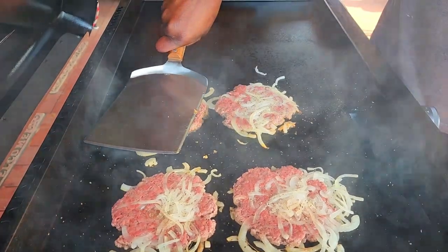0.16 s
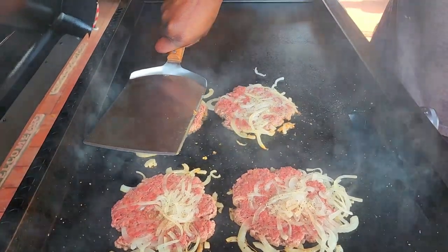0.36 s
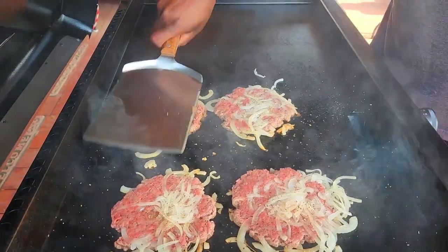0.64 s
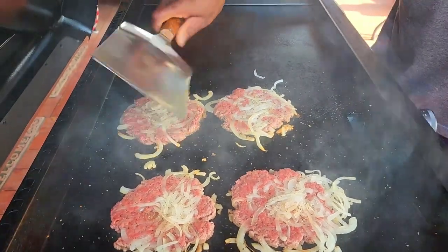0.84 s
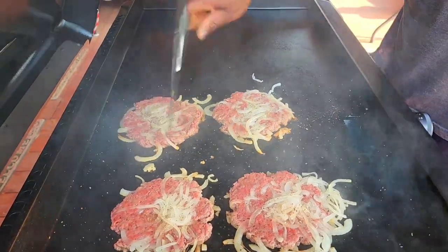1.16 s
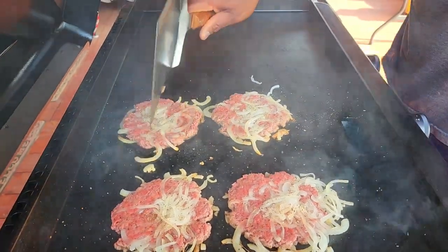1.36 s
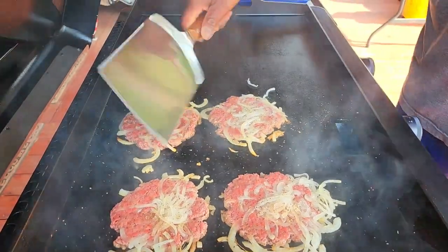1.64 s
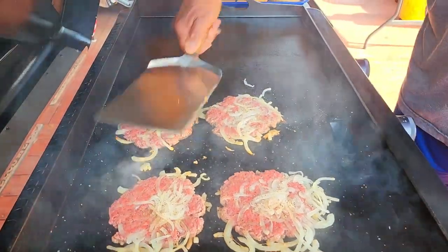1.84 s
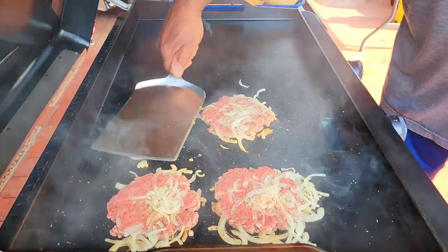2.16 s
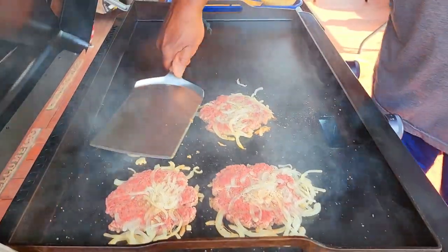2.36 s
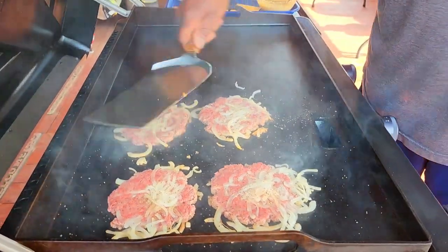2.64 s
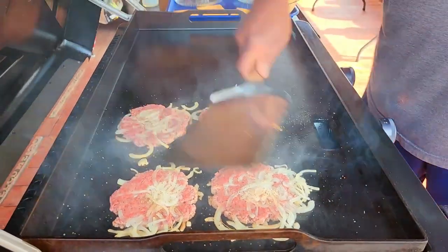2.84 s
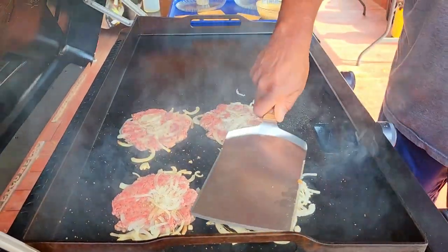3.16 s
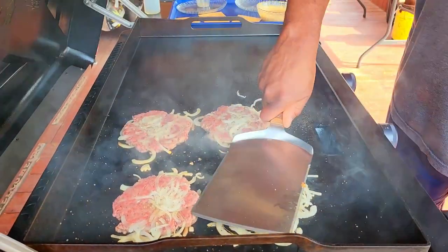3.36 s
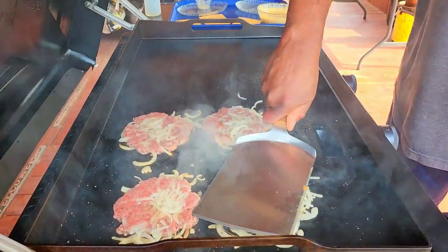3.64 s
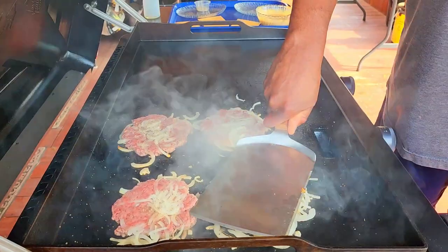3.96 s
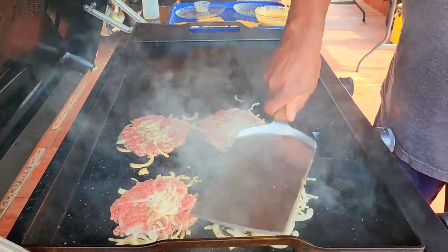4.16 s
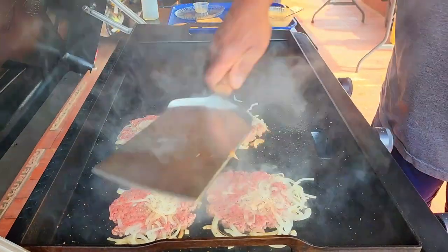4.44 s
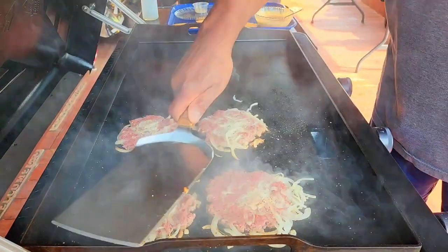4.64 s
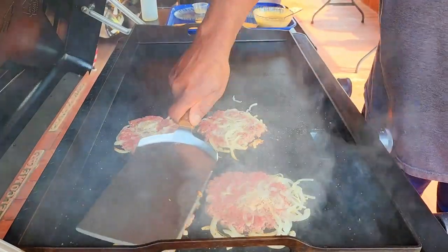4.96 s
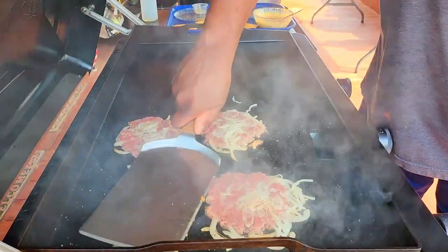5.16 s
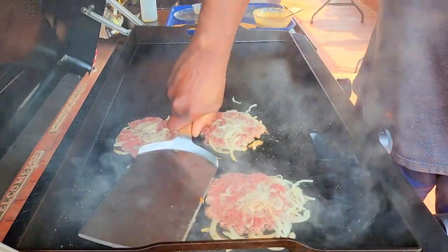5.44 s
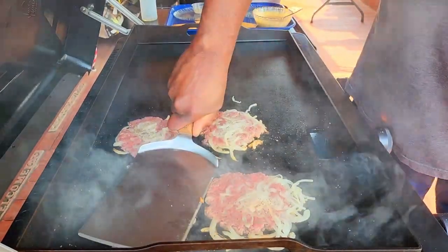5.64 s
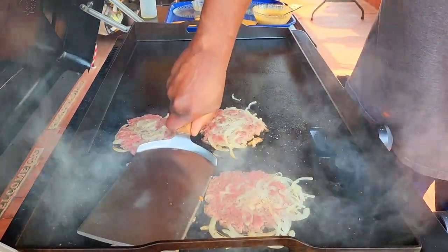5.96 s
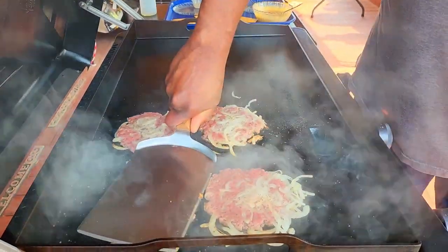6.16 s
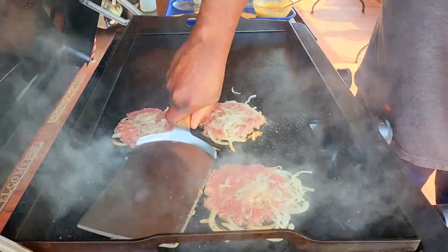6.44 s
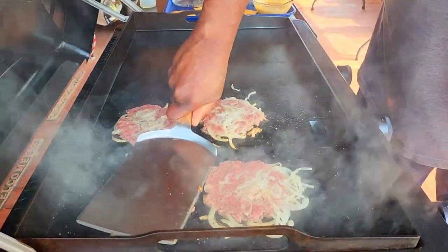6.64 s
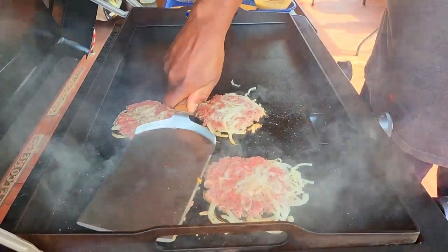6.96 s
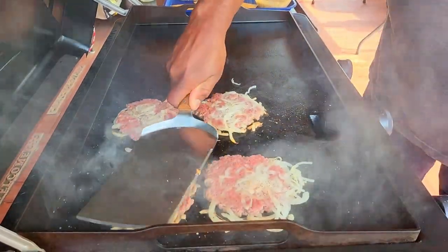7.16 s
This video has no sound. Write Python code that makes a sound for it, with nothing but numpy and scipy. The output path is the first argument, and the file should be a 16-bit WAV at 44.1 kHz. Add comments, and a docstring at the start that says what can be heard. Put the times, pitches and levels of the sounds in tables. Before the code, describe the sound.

Close to a hot griddle outdoors, patties and onions fry with a dense bright hiss, lower wet sputter and fine airy spray. Each spatula press makes the sizzle surge and thicken. Around the middle the metal blade clacks sharply on the plate and scrapes briefly, then a long press brings strong sputtering. Small fat pops and a very faint low outdoor rumble; stereo microphone, dry open air.

```python
"""Beef patties and onions sizzle on a steel griddle outdoors, close to a stereo microphone.
The sizzle is filtered noise with grains for bursting steam bubbles: a hiss, a sputter, a spray, spits and pops.
Pressing with a spatula squeezes out juice that sputters lower, and steam sings as noise in a resonance.
The blade clacks on the steel and slides: noise cracks and decaying modes ring, then noise-driven modes scrape.
Below lies a low outdoor rumble of filtered noise with a faint wavering hum."""
import sys
import numpy as np
from scipy import signal
from scipy.io import wavfile
from scipy.ndimage import uniform_filter1d

SR = 44100
rng = np.random.default_rng(int(sys.argv[2]) if len(sys.argv) > 2 else 0)


def waveform_to_disk(signal):
    """Save audio, clipped to [-1, 1], as 16-bit WAV at the path in sys.argv[1]."""
    frames = np.transpose(np.atleast_2d(signal))
    scaled = np.clip(frames, -1, 1) * 32767
    samples = np.round(scaled).astype(np.int16)
    wavfile.write(sys.argv[1], SR, samples)


N = 321489
TIME = np.arange(N) / SR

# modes of steel plate and blade, each contact damps them further: frequency_hz, relative_level_db, free_t60_s
STEEL_MODES = [(119, -5, 0.25), (298, -8, 0.31), (305, 1.5, 0.33), (315.4, 0, 0.35), (396, -6, 0.35),
               (465.5, 3.5, 0.36), (517, 1, 0.37), (752, -9, 0.48), (856, -1, 0.38), (922, 10.5, 0.28),
               (953, 3, .22), (1097, 6, 0.24), (1223, 4, .26), (1537, 9.5, 0.28), (1654, 13, .3),
               (1740, 8, 0.28), (1820, 3, .22), (1923, 11, 0.21), (2070, 2, .14), (2340, 5, 0.28),
               (2440, 5, .12), (3800, 4, .065), (5760, 28, 0.069), (7130, 28.5, 0.06)]
# spectrum of a short crack or snap: frequency_hz, level_db (per Hz)
CRACK_SPECTRUM = [(40, -50), (110, -3.5), (650, -2), (1000, 6), (1800, 10), (3000, 6), (4200, 2),
                  (5800, 8.5), (7400, 2), (9000, -2), (16000, -28)]
# the spatula presses one patty after another; its surges and gap level are those before the juice runs low:
# start_s, length_s, hiss_surge_db, sputter_surge_db, gap_steam_db, gap_pitch_hz
PATTY_PRESSES = [(-0.3, 0.8, 5, 5, -39.5, 1920), (1.894, 0.55, 4, 3.5, -33, 2050),
                 (3.04, 1.05, 7.5, 8, -32, 1630), (4.903, 2.18, 8.5, 8, -39, 1480)]
# the microphone draws back from the patties and sways: time_s, level_db, lean_to_right_db
MIC_NEARNESS = [(0.5, 0.5, 0.7), (1.0, -0.6, 1), (1.8, 0.6, 0.9), (2.2, -1, 0.1), (3.0, -3.5, 0),
                (4.3, -3, 0.5), (4.95, -3.5, 0), (5.3, -3.5, 0), (6.1, -2.5, 0.1), (7.2, -4, 0)]


def amp(db):
    """Level law: twenty decibels are a factor of ten in amplitude."""
    return 10 ** (np.asarray(db) / 20)


def unit(x):
    """Normalization: a signal divided by its root mean square has rms 1."""
    return x / np.sqrt(np.mean(x ** 2) + 1e-20)


def read(points, hz):
    """Interpolation of a table by straight lines on a log-frequency axis."""
    f, value = np.transpose(points)
    return np.interp(np.log(hz + 1), np.log(f), value)


def follow(rows):
    """Interpolation of a table by straight lines in time, one array a column."""
    s, *columns = np.transpose(rows)
    return [np.interp(TIME, s, column) for column in columns]


def colour(x, spectrum, size=4096):
    """Minimum-phase filtering: a causal filter of given spectrum keeps the sharp front of clicks."""
    log_gain = np.log(amp(read(spectrum, abs(np.fft.fftfreq(size, 1 / SR)))))
    # the phase is the Hilbert transform of the log gain
    response = np.exp(np.conj(signal.hilbert(log_gain)))
    taps = np.fft.ifft(response).real[:size // 2]
    return signal.oaconvolve(x, taps[None], axes=1)[:, :N]


def drift(rate_hz):
    """Slow random modulation: straight lines join random knots, two per period of the rate; rms 1."""
    knots = rng.standard_normal(8000)
    return unit(np.interp(TIME * 2 * rate_hz, np.arange(len(knots)), knots))


def rush(hz, width):
    """Band resonance: noise in a band of relative half-width, rms 1."""
    edges = 1 + np.clip(width, .02, .8) * np.array([-1, 1])
    band = signal.butter(2, hz * edges, "band", fs=SR, output="sos")
    return unit(signal.sosfilt(band, rng.standard_normal((2, N))))


def bell(x, centre_hz, octaves, gain_db, size=512):
    """Time-varying equalization: lifts or cuts one band; its centre and gain may follow curves."""
    hz, frames, z = signal.stft(x, SR, nperseg=size)
    centre = np.interp(frames, TIME, centre_hz * np.ones(N))
    gain = np.interp(frames, TIME, gain_db * np.ones(N))
    band = np.exp(-.5 * (np.log2((hz[:, None] + 1) / centre) / octaves) ** 2)
    return signal.istft(z * amp(band * gain), SR, nperseg=size)[1][:, :N]


def bursts(per_s, spread_db, low_hz, high_hz, cycles, count=32):
    """Bubble impulses: each of many spots has its own pitch and a delay in either channel; rms 1."""
    t, out = np.arange(256) / SR, np.zeros((2, N + 512))
    for hz in np.geomspace(low_hz, min(high_hz, SR / 2), count):
        number = int(np.clip(per_s * N / SR / count, 1, 4000))
        chance = rng.random((4000, 3))[:number]
        at = (chance[:, 0] * N).astype(int)
        size = amp(spread_db * np.minimum(-np.log(chance[:, 1]), 5)) * np.sign(chance[:, 2] - .5)
        pop = unit(np.exp(-t * hz / cycles) * np.sin(2 * np.pi * hz * t))
        for channel, delay in enumerate(rng.integers(0, 16, 2)):  # in samples
            places = at[:, None] + delay + np.arange(len(t))
            out[channel] += np.bincount(places.ravel(), np.outer(size, pop).ravel(), out.shape[1])
    return unit(out[:, :N])


def spurts(per_s, fade_s, spread_db):
    """Shot noise: random sudden releases that decay exponentially give a power envelope of mean 1."""
    begins = rng.exponential(1, N), rng.random(N) < per_s / SR
    size = amp(spread_db * np.minimum(begins[0], 4)) ** 2 * begins[1]
    power = signal.lfilter([1], [1, -np.exp(-1 / (fade_s * SR))], size)
    return power / power.mean()


def soften(hz, bright_hz):
    """Contact stiffness: a softer contact drives the higher frequencies less."""
    return 1 / np.sqrt(1 + (hz / bright_hz) ** 4)


def squeeze(start, length, fade_s):
    """Flow and depletion: juice of one press, 0-1, flows out, runs low, and boils off once the blade lifts."""
    flow_s, spend_s = 0.43, 3.8
    since = np.maximum(TIME - start, 0)
    flow = np.sin(np.pi / 2 * np.minimum(since / flow_s, 1)) ** 2
    return flow * np.exp(-since / spend_s - np.maximum(since - length, 0) / fade_s)


def surges():
    """Boiling rate: the dB by which all presses lift hiss and sputter."""
    hiss_fade_s, sputter_fade_s = 0.36, 0.39
    boil_db = sum(db * squeeze(s, length, hiss_fade_s) for s, length, db, *_ in PATTY_PRESSES)
    juice_db = sum(db * squeeze(s, length, sputter_fade_s) for s, length, _, db, *_ in PATTY_PRESSES)
    return boil_db, juice_db


def covered(lead_s=0.06, trail_s=0.12):
    """Shadowing: how far the blade covers a patty, 0-1, from just before each press until just after it."""
    over = sum((TIME > s - lead_s) * (TIME < s + length + trail_s) for s, length, *_ in PATTY_PRESSES)
    return uniform_filter1d(over * 1., size=4096)


def rumble():
    """Broadband noise and frequency modulation: low outdoor rumble with a faint wavering hum."""
    # frequency_hz, level_db (per Hz)
    rumble_spectrum = [(15, -33), (28, -9), (41, 3.5), (60, 0), (85, 0), (104, 5.5), (124, 2.5), (150, -9),
                       (300, -35), (600, -2), (2000, -44.5)]
    out = amp(-50.0) * unit(colour(rng.standard_normal((2, N)), rumble_spectrum))
    hum = np.sin(2 * np.pi * np.cumsum(100 + 2.55 * drift(6.8)) / SR)
    out[0] += amp(-59.0 + 1.7 * drift(0.83)) * hum
    return out


def slide(grit_db=-4, size=512):
    """Friction-driven modes: the edge grinds over the plate; meat damps it, so the scrape mostly darkens."""
    # time_s, level_db, brightness_hz
    slide_path = [(4.553, -44, 4000), (4.572, -37, 3200), (4.615, -28.5, 2400), (4.655, -30, 950),
                  (4.70, -34, 600), (4.76, -34.5, 800), (4.82, -42, 600), (4.93, -43, 400)]
    level_db, bright_hz = follow(slide_path)
    t = np.arange(SR // 2) / SR
    noise = rng.standard_normal((2, N))
    grit = noise * np.sqrt(spurts(per_s=500, fade_s=0.0036, spread_db=17.0))
    ring = np.zeros(len(t))
    for hz, db, t60 in STEEL_MODES:
        if hz < 5000:
            decay = np.exp(-3 * np.log(1000) * t / t60)  # a third of the free ring time
            ring += amp(db) * decay * np.sin(2 * np.pi * hz * t)
    ringing = unit(signal.oaconvolve(grit, ring[None], axes=1)[:, :N])
    sound = ringing + amp(grit_db) * unit(colour(grit, CRACK_SPECTRUM))
    hz, frames, z = signal.stft(sound, SR, nperseg=size)
    z = z * soften(hz[:, None], np.interp(frames, TIME, bright_hz))
    sound = signal.istft(z, SR, nperseg=size)[1][:, :N]
    # level the short-time power, so that the table sets the loudness
    power = uniform_filter1d(sound ** 2, size=1024)
    touching = (TIME > slide_path[0][0]) & (TIME < slide_path[-1][0])
    return sound / np.sqrt(abs(power) + 1e-12) * amp(level_db) * touching


def blows(crack_s=0.0017, rattle_s=0.069, rattle_db=-13, held=0.61, spot_db=2):
    """Modal excitation: each blow cracks and rings the steel; the spot that it hits changes the mix of modes."""
    # the blade lands, bounces and settles: time_s, relative_ring_db, relative_crack_db, brightness_hz
    blade_contacts = [(3.87, -39.5, -54, 300), (4.5525, -38.5, -15.5, 10000), (4.5596, -40, -19, 8000),
                      (4.5660, -36.5, -22, 6800), (4.574, -27.5, -32, 310), (4.622, -36.5, -44, 1500),
                      (4.649, -27, -47, 850), (4.684, -34, -55, 550), (4.753, -44, -39, 1600),
                      (4.782, -33.5, -59, 400)]
    rings, chatter, t = np.zeros((2, N)), np.zeros((2, N)), np.arange(SR) / SR
    for s, ring_db, crack_db, bright_hz in blade_contacts:
        span = slice(round(s * SR), round(s * SR) + SR)
        contact = np.exp(-t / crack_s) + amp(rattle_db) * np.exp(-t / rattle_s)
        chatter[:, span] += amp(crack_db) * contact * rng.choice([-1, 1], (2, SR))
        spots = rng.uniform(-1, 1, (len(STEEL_MODES), 2))
        for (hz, db, t60), (spot, across) in zip(STEEL_MODES, spots):
            decay = np.log(1000) * t / (held * t60)  # the held blade rings shorter
            swing = np.exp(2j * np.pi * hz * t - decay) * (1 - np.exp(-t * hz / 2))
            gain = amp(ring_db + db + spot_db * spot) * soften(hz, bright_hz)
            rings[:, span] += gain * np.array([swing.imag, np.sign(across) * swing.real])
    return rings + amp(6.5) * colour(chatter, CRACK_SPECTRUM)


def swells(rows, width, taper):
    """Windowed resonance: each row is a soft-edged rush of noise in one band."""
    out = np.zeros((2, N))
    for s, db, hz, length in rows:
        span = slice(round(s * SR), round((s + length) * SR))
        part = unit(rush(hz, width)[:, span])
        out[:, span] += amp(db) * part * signal.windows.tukey(part.shape[1], taper)
    return out


def pressing(gap_fade_s=0.075):
    """Cavity resonance: steam sings in the gap under the blade, and soft meat passes dull pushes to the griddle."""
    # low, dull swells, most as the spatula leans on the meat: start_s, level_db, pitch_hz, length_s
    dull_pushes = [(2.06, -50, 230, 0.14), (3.17, -52, 247, 0.82), (4.414, -50, 412, 0.15),
                   (4.56, -42, 110, 0.1), (4.844, -48, 97, 0.15), (4.99, -41, 83, .12),
                   (5.03, -51, 110, 0.24), (6.95, -51, 42, 0.2)]
    gap = np.zeros((2, N))
    for s, length, _, _, gap_db, gap_hz in PATTY_PRESSES:
        gap += amp(gap_db) * squeeze(s, length, gap_fade_s) * rush(gap_hz, width=0.082)
    return gap + swells(dull_pushes, width=0.31, taper=0.3)


def pops(snap_s=0.00027):
    """Impulsive release: a near drop of fat bursts with one dry snap of decaying noise."""
    # time_s, relative_level_db
    near_drops = [(0.122, -8), (0.207, -14), (0.2452, -12), (0.374, -15), (1.583, -14), (2.751, -18),
                  (4.063, -13), (4.310, -16), (5.275, -14), (6.035, -10)]
    out, t = np.zeros((2, N)), np.arange(256) / SR
    for s, db in near_drops:
        snap = np.exp(-t / snap_s) * rng.choice([-1, 1], (2, len(t)))
        out[:, round(s * SR):][:, :len(t)] += amp(db) * snap
    return colour(out, CRACK_SPECTRUM)


def frying_layer(spectrum, level_db, grains, grain_db, steam, flutter_db, flutter_hz=21):
    """Superposition of sources: near bursts over a wash of countless far ones that swells with the steam."""
    wash = rng.standard_normal((2, N)) * unit(np.sqrt(1 + abs(steam)))
    sound = colour(wash + amp(grain_db) * grains, spectrum)
    return unit(sound * amp(flutter_db * drift(flutter_hz))) * amp(level_db)


def sizzle():
    """Boiling noise: fat hisses, juice sputters, a fine spray fizzes on top, and drops spit."""
    # three spectra: frequency_hz, level_db (per Hz)
    hiss_spectrum = [(1000, -39.5), (2600, -33), (3600, -19.5), (4400, -4), (5100, 0), (5550, 1.9),
                     (5900, 0.6), (6350, 1.5), (6950, -0.5), (7350, 1.5), (7800, -4), (8700, -7.5),
                     (9500, -8), (11000, -37), (16000, -34)]
    sputter_spectrum = [(60, -39), (170, -15.5), (300, -13), (390, -16), (520, -15.5), (700, -11),
                        (1000, -5), (1450, 2), (1800, 2.5), (2400, 1), (3000, -5), (4200, -2.5),
                        (7000, -42), (16000, -32)]
    spray_spectrum = [(4000, -13.5), (8000, -1), (10000, 5.5), (11000, 4.5), (12500, 6.5), (15700, 8.5),
                      (17000, -38)]
    # broad peak of the hiss that shifts from patty to patty: time_s, pitch_hz before it wanders
    hiss_pitch = [(0, 5540), (1.9, 5460), (3.0, 6440), (3.7, 5330), (4.5, 6400), (5.3, 7300), (6.2, 6800),
                  (7.2, 6400)]
    peak_db, peak_octaves, wander_octaves = 2, 0.31, 0.11
    # hollow between sputter and hiss: its depth with the blade lifted, its waver, dB filled per dB of surge
    hollow_hz, hollow_octaves = 3300, 0.24
    hollow_rest_db, hollow_waver_db, juice_fills = 0.1, 0.95, 0.84
    # without juice, the low bubbling drops by lull_db
    lull_hz, lull_octaves, lull_db = 370, 0.49, 3.5
    boil_db, juice_db = surges()
    near_db, shade = follow(MIC_NEARNESS)[0], covered()
    # base levels with the blade lifted; the blade shades hiss and spray
    hiss_db = -24 + boil_db + near_db - 0.94 * shade
    sputter_db = -33 + juice_db + 0.13 * near_db
    spray_db = -26 + 0.5 * boil_db + 0.76 * near_db - 1.5 * shade

    fat = bursts(700, 3.3, 3500, 9000, cycles=2.5)
    juice = bursts(900, 1.9, 855, 4400, cycles=3.9)
    mist = bursts(1800, 2.3, 7900, 15600, cycles=2.7)
    steam = spurts(per_s=260, fade_s=0.005, spread_db=2.5)
    wisps = spurts(per_s=600, fade_s=.004, spread_db=2.2)

    hiss = frying_layer(hiss_spectrum, hiss_db, fat, grain_db=-14, steam=0.23 * steam, flutter_db=0.43)
    sputter = frying_layer(sputter_spectrum, sputter_db, juice, grain_db=-16.5,
                           steam=0.084 * steam, flutter_db=0.85)
    sputter = bell(sputter, lull_hz, lull_octaves, -lull_db * amp(-2 * juice_db))
    spray = frying_layer(spray_spectrum, spray_db, mist, grain_db=-6.5,
                         steam=0.2 * wisps, flutter_db=0.8, flutter_hz=28)
    drops = bursts(20, 2.5, 2500, 12000, cycles=.7, count=12)
    spits = unit(colour(drops, CRACK_SPECTRUM)) * amp(hiss_db - 25)

    peak_hz = follow(hiss_pitch)[0] * 2 ** (wander_octaves * drift(11))
    hiss = bell(hiss, peak_hz, peak_octaves, peak_db)
    hollow_db = hollow_rest_db - juice_fills * juice_db + hollow_waver_db * drift(9)
    return bell(hiss + sputter + spits + spray, hollow_hz, hollow_octaves, -hollow_db)


def pair(x, size=2048):
    """Interchannel coherence: two signals become a microphone pair alike in the bass; one port leads the other."""
    # frequency_hz, left_right_likeness (correlation, 0-1)
    likeness = [(100, .97), (300, .92), (1000, .76), (1500, .48), (2000, .36), (2400, .54), (3200, .15),
                (3800, .34), (4300, .18), (4900, .38), (5700, .2), (6300, .45), (7000, .28), (7600, .33),
                (8200, .14), (15000, .05)]
    # frequency_hz, left_minus_right_db before the sway
    balance = [(200, 0), (700, -1), (1450, -2), (2300, 1.5), (3000, 1.2), (3900, -1.5), (5100, 2),
               (6600, 1.5), (7500, -5.5), (8450, -12.5), (9200, -2), (10400, -0.5), (13000, -1.5),
               (14400, -2), (15800, 0)]
    # frequency_hz, left_lead_rad
    phase_lead = [(300, 0), (700, .25), (1750, 2.1), (2300, .6), (2900, 1.8), (3500, -1), (4000, -.8),
                  (4700, 1.8), (5600, 2.8), (6500, 2.7), (7100, 1.9), (7800, 2.4), (8400, -.6), (9500, 1.2)]
    hz, _, z = signal.stft(x, SR, nperseg=size)
    # half the angle whose cosine is the correlation
    turn = np.arccos(np.clip(read(likeness, hz), -1, 1))[:, None] / 2
    mid, side = z[0] * np.cos(turn), z[1] * np.sin(turn)
    lean = (amp(read(balance, hz) / 2) * np.exp(.5j * read(phase_lead, hz)))[:, None]
    ports = np.array([(mid + side) * lean, (mid - side) / lean])
    return signal.istft(ports, SR, nperseg=size)[1][:, :N]


def scene():
    """Linear superposition: everything on the griddle, heard by the microphone pair as it sways."""
    right_db = follow(MIC_NEARNESS)[1]
    griddle = sizzle() + pops() + rumble() + blows() + slide() + pressing()
    return pair(griddle) * amp([-right_db / 2, right_db / 2])


def record(dry):
    """Saturation and band limiting: the highest peaks round off, then a low-pass removes the top."""
    edge_hz = 16000
    rounded = dry / (1 + (dry / .85) ** 6) ** (1 / 6)
    low_pass = signal.firwin(511, edge_hz, window=("kaiser", 9), fs=SR)
    return signal.oaconvolve(rounded, low_pass[None], "same")


dry = scene()
out = record(dry)
waveform_to_disk(out)
```